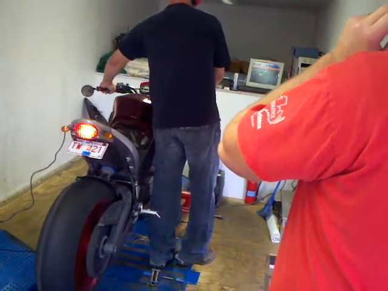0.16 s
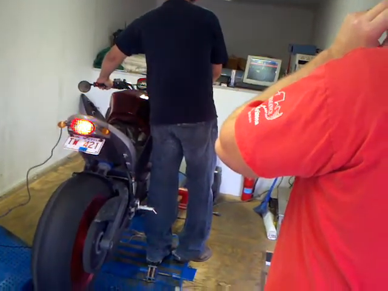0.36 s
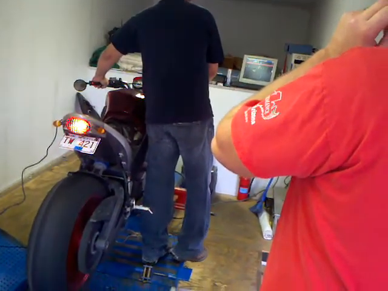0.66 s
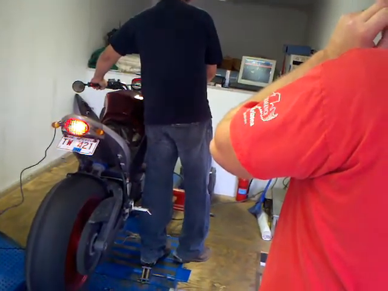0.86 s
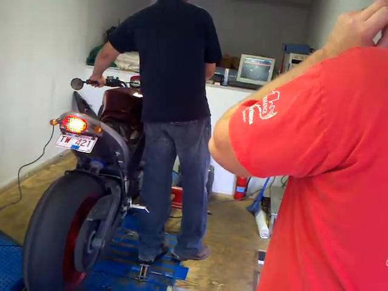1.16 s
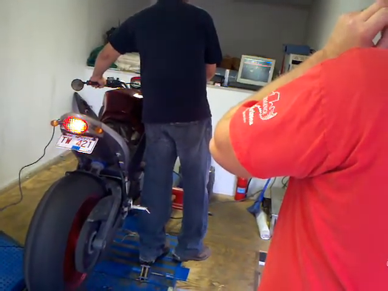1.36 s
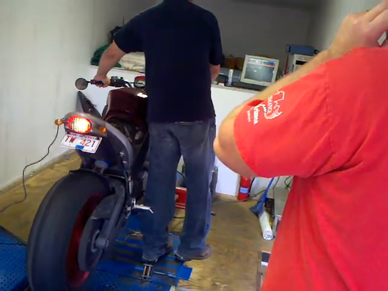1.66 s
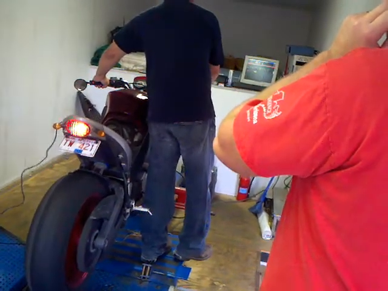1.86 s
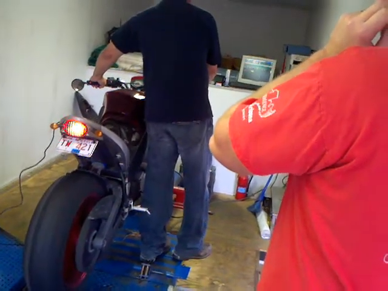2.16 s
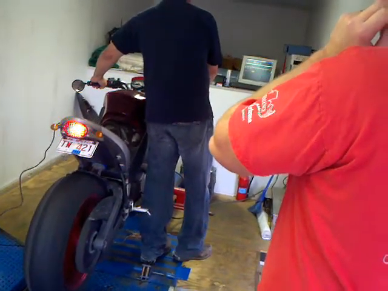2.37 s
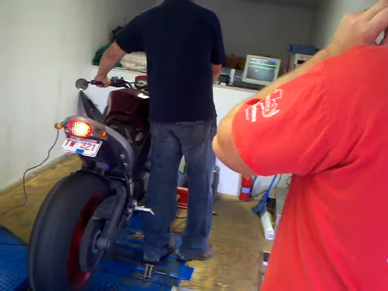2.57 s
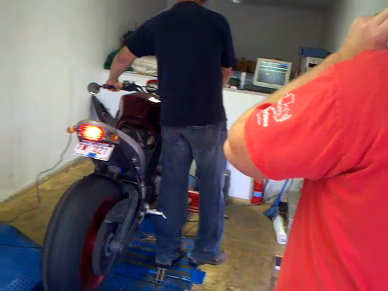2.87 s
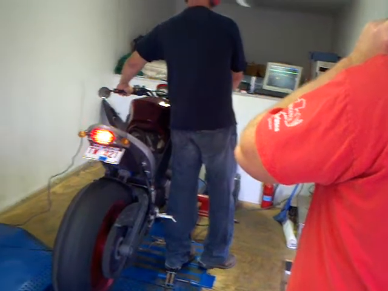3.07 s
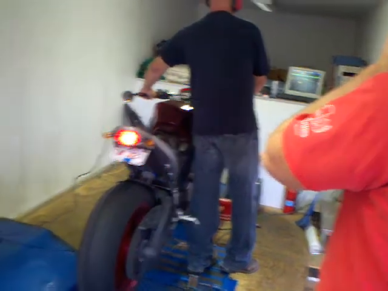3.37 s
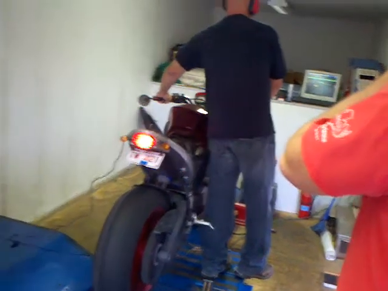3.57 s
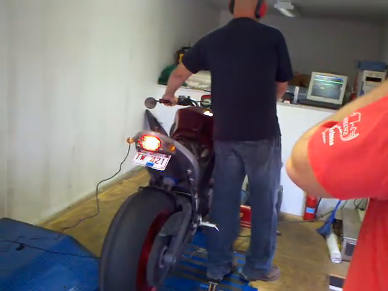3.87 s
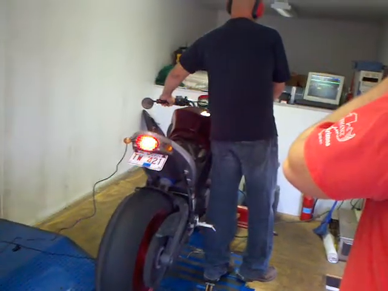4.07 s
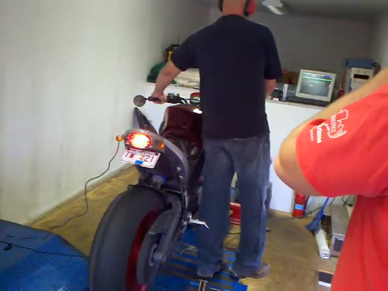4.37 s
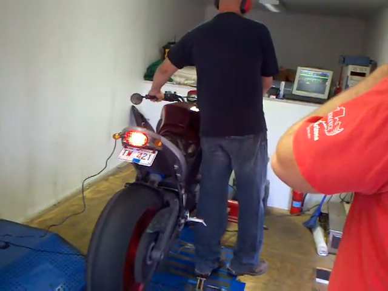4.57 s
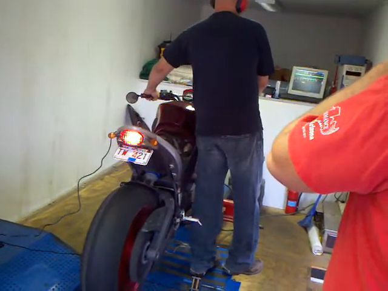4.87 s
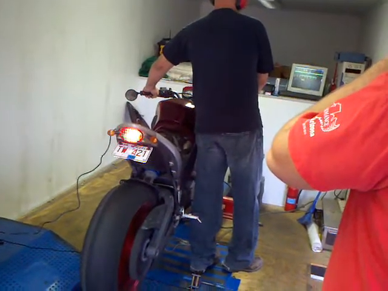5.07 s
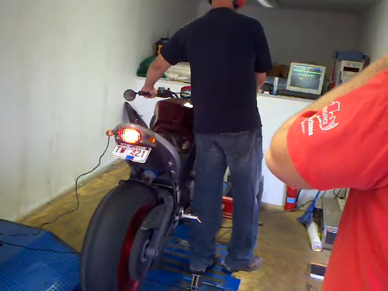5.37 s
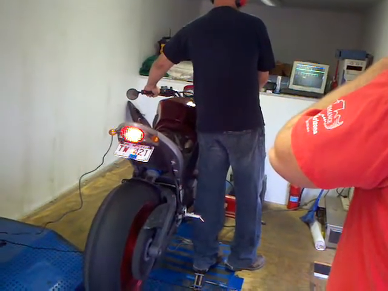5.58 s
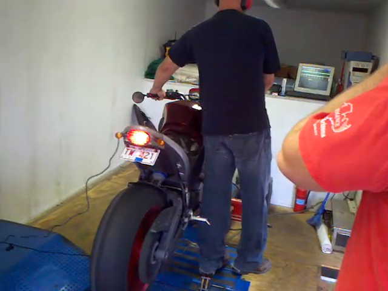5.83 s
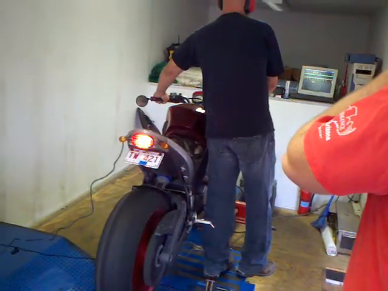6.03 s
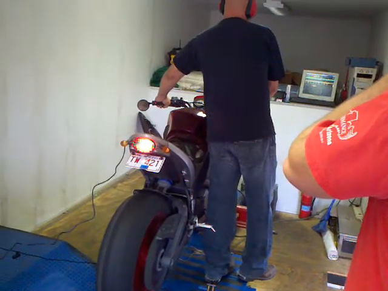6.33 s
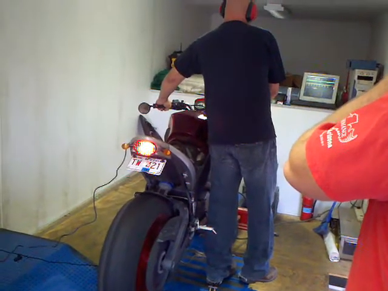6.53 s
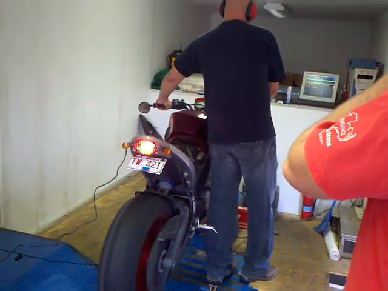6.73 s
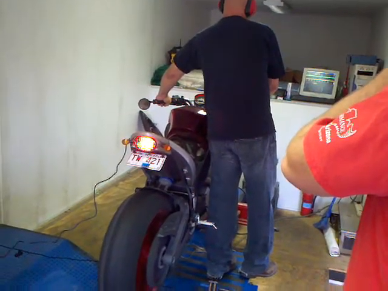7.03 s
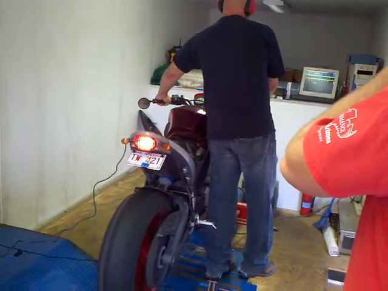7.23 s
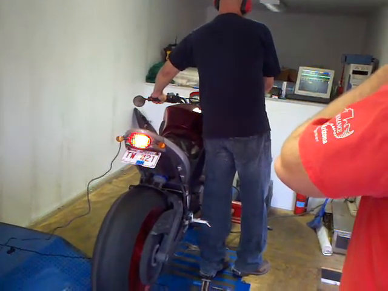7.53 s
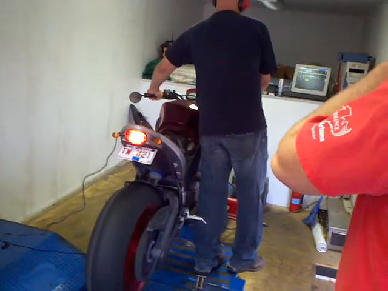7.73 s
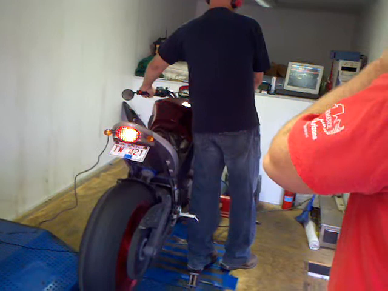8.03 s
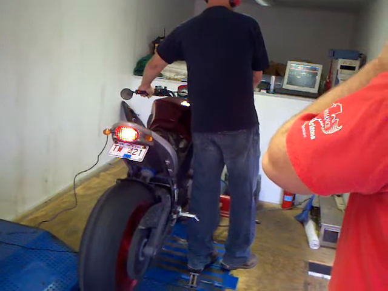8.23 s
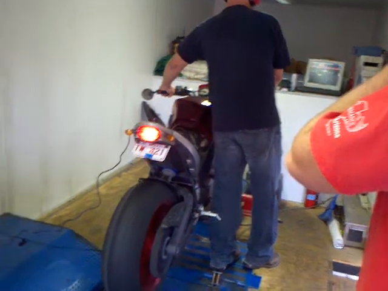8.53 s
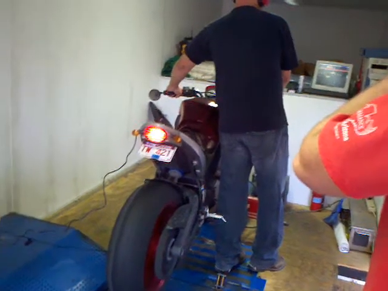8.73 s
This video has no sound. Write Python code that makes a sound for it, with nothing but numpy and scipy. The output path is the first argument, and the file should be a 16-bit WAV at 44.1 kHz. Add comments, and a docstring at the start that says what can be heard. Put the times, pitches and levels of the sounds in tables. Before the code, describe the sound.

A loud V-twin motorcycle holds a steady rough roar, drops to a soft whining coast, then pulls hard up to sustained high revs indoors.

```python
"""A small, hard-walled workshop: a V-twin motorcycle on a dynamometer, a widened stereo microphone close behind.
Steady load, a coast with the throttle shut, then a pull to high revs that it holds.
Unevenly spaced firing pulses ring pipe, headers and room; noise bursts at each firing give the cracks of gas.
A falling set of harmonics makes the whine of the drive belt in the coast."""
import sys
import numpy as np
from scipy import signal
from scipy.fft import rfft, irfft
from scipy.io import wavfile
from scipy.ndimage import uniform_filter1d

SR = 44100
rng = np.random.default_rng(int(sys.argv[2]) if len(sys.argv) > 2 else 0)


def waveform_to_disk(signal):
    """Save audio, clipped to [-1, 1], as 16-bit WAV at the path in sys.argv[1]."""
    frames = np.transpose(np.atleast_2d(signal))
    scaled = np.clip(frames, -1, 1) * 32767
    samples = np.round(scaled).astype(np.int16)
    wavfile.write(sys.argv[1], SR, samples)


N = 392490
T = np.arange(N) / SR
SIZE = 2 ** 19  # transform length, samples
FREQ = np.arange(SIZE // 2 + 1) * SR / SIZE

# engine speed: t/s, four-stroke cycle rate f/Hz
ENGINE_SPEED = [(0.0, 24.0), (1.56, 23.97), (1.7, 21.2), (2.1, 18.92), (2.85, 18.0), (3.1, 17.95),
                (3.3, 18.75), (3.5, 19.4), (3.8, 21.07), (5.0, 29.28), (5.6, 34.46), (5.9, 34.93),
                (6.45, 33.12), (6.95, 32.49), (7.5, 33.14), (8.1, 33.47), (8.9, 33.49)]
# the rider holds the throttle open: opens t/s, shuts t/s
THROTTLE_OPENINGS = [(-1, 1.565), (3.1, 10)]
# pipe and room resonances: f/Hz, width/Hz, relative level/dB at the left port, at the right port
PIPE_MODES = [(78, 2.7, -14, -25.5), (97.7, 15.6, -5, -39), (118.6, 15.4, -9, -33), (140, 5, -1, 3.5),
              (168.85, 20.3, 4, -18), (212.6, 10.9, 7, 0), (229.65, 12.67, 7.5, -10),
              (268.5, 14, -8.5, -1.5), (298.84, 18.5, -3, 5), (330.54, 9.7, -1.5, 4),
              (385.76, 10.47, 3.5, 1.5), (424, 14, -9, -10), (462, 18, -2.3, 0.3)]
# room resonances that build up late: f/Hz, width/Hz
LATE_MODES = [(156, 27), (198, 18), (288, 48), (348, 37), (380, 39)]
# phase by which the left port leads: f/Hz, phase/rad
PORT_PHASE = [(60, 7), (125, 2.74), (170, 4.88), (230, 3.307), (300, 1.784), (385, 1.407), (470, 2),
              (650, 1.7), (900, 1), (1300, .3)]
# higher resonances of the headers: f/Hz, width/Hz, level/dB at the left port, at the right port
HEADER_MODES = [(537, 28, 7.5, 11.7), (603, 10, 3.5, 8), (637.0, 44.6, 0.9, 7.8), (694, 10.7, 3, 10),
                (751.9, 54.6, 5.2, -1.3), (815, 9, 8, 6), (839.5, 14.5, 0.4, 3.3), (864.6, 9, 2, 5),
                (921.6, 70.0, -0.5, -1.7), (1116.1, 70.0, -2.7, -2.3), (1205.1, 10.0, -1.2, -0.1),
                (1270.0, 70.0, -5.1, -5.0), (1323.5, 19.9, 1.2, 1.1), (1460.0, 70.0, -4.6, -5.5)]
# returns from floor, walls and ceiling: delay t/s, relative level/dB
WALL_ECHOES = [(0, -1.5), (.003, 1), (.0085, -13), (0.011, -8), (0.018, -7)]
# colour of the rasping gas: f/Hz, relative spectral level/dB
RASP_COLOUR = [(50, -15.5), (120, 3.5), (250, 4.5), (450, 2.5), (700, -1.5), (1300, -2.8), (2000, -5),
               (3000, -7), (4200, -17), (5500, -12.5), (9000, -53), (14000, -54)]
# colour of the hissing gas: f/Hz, relative spectral level/dB
HISS_COLOUR = [(1000, -9.5), (2500, -1), (4000, 1.5), (5400, -5), (7500, 3.6), (9500, 2), (12000, -0.5),
               (14000, -2.5)]
# sharp ticks from the exhaust: t/s, level/dB before their common gain
EXHAUST_TICKS = [(1.5345, -8), (3.8637, -14), (3.9566, -9.5), (3.9809, -10.5)]
# first hard burns of the pull: t/s, level/dB before their common gain
FIRST_BURNS = [(3.206, -16), (3.261, -13), (3.316, -14), (3.368, -12), (3.421, -13)]
# belt teeth meshing: multiple of the tooth rate, mean level/dB
BELT_HARMONICS = [(2, -44), (3, -41.5), (6, -47.5), (9, -51), (10, -57), (12, -55)]
# belt tooth rate in the coast: t/s, f/Hz
TOOTH_RATE = [(1.6, 850), (1.88, 772), (2.1, 735), (2.55, 704), (2.95, 677), (3.2, 667)]

# layer laws, before each layer's trims: level/dB at full throttle and cruising speed, level/dB per octave
# of speed, level/dB in the coast, power of the cylinder filling, release t/s
BOOM_LAW = (-17, 6.5, -36, 0.48, 0.0239)
RASP_LAW = (-21.9, 7.8, -35.8, 4.5, 0.009)
HOWL_LAW = (-8.7, 12, -37, 3, 0.014)
HISS_LAW = (-33, 15, -41.5, 13, 0.04)
# resonant lift of the boom at one speed: cycle rate f/Hz, half width/Hz, level/dB
PIPE_TUNING = (30.2, 2.54, 1.46)
# share of gas leaving in cracks at full throttle: share (0-1) at cruising speed, change per octave
CRACK_SHARE = (0.46, -0.72)
# scatter from burn to burn: level/dB at cruising speed, level/dB per octave
BURN_SCATTER = (.7, -2.5)
# first minus second cylinder's crack: level/dB at steady speed, level/dB per Hz/s of acceleration
CYLINDER_LEAN = (1, -0.5)
# change per unit of filling the first cylinder lacks: first cylinder level/dB, second cylinder level/dB
CATCH_DB = (-18, 2)
# cycle rates between which the barks run together: starts f/Hz, complete f/Hz
BARK_FADE_HZ = [23.72, 31.5]

CRUISE_HZ = 24  # cycle rate at which the speed laws are given
START_TURN, VEE_GAP = .56, .44  # parts of a four-stroke cycle
JITTER_S, CRANK_SHAKE = .00004, .0012  # firing jitter; cycles of shake per dB of burn scatter
OPEN_S, SHUT_S = .06, 0.03  # time constants of the cylinders' filling and emptying
CATCH_S = 0.268  # time constant of the first cylinder, slower to burn hard again
CATCH_SHARE = .15  # extra share of rasp in cracks, per unit lacking
BITE_POWER = 3  # the cracks come only once the cylinders are nearly full
BOOM_FULL_HZ = 28.98  # above this cycle rate the boom's speed law is flat
SWELL_S, SWELL_DB = 0.1, -16  # hard-burn time constant (fresh air takes a quarter); gain of the soft swell
BARK_DB, BARK_FAST_DB = 2.7, -13.5  # against the rasp law; change at high revs
PULL_SMOOTH_S = 0.46  # span over which the acceleration is averaged
PULL_SMEAR = 0.095  # share of crack lost for each Hz/s of acceleration
COAST_HISS_HZ, COAST_HISS_WIDTH_HZ = 7500, 6500  # band of the whirr with the throttle shut
PORT_LAG_S = 1 / 2620  # delay of the opposite port in the microphone
TOP_HZ = 14000  # upper limit of the camera's sound


def burns(turns, cycle_hz, throttle):
    """Uneven burning shakes the crank and changes the size of the blows; the first cylinder catches late."""
    scatter_db = np.maximum(at_speed(cycle_hz, *BURN_SCATTER), 0)
    cylinders = firings(turns + CRANK_SHAKE * scatter_db * walk(30), JITTER_S)
    # keep the pulse power even as the firing rate changes
    cylinders = cylinders * np.sqrt(SR / cycle_hz / 2) * undb(scatter_db * walk(51))
    return cylinders * undb(np.outer(CATCH_DB, lacking(throttle)))


def firings(turns, jitter_s):
    """One pulse train per cylinder; the angle of the vee spaces them unevenly."""
    trains = np.zeros((2, N))
    for train, offset in zip(trains, (0, VEE_GAP)):
        cycles = np.arange(int(turns[-1]) + 1) + offset
        when = np.interp(cycles, turns, T, left=-1, right=-1)
        at = ((when + jitter_s * rng.standard_normal(len(when))) * SR).astype(int)
        train[at[(at >= 0) & (at < N)]] = 1
    return trains


def blows(pulses, throttle, cycle_hz, coast_hz=120, coast_db=16.0, short_hz=150, short_db=3,
          low_rev_hz=26, high_rev_hz=32):
    """Shut throttle gives soft puffs; at high revs the blows run together and lose their bass."""
    fast = np.clip((cycle_hz - low_rev_hz) / (high_rev_hz - low_rev_hz), 0, 1)
    short = filtered(pulses, causal(undb(short_db) * abs(1 - lowpass(short_hz)) ** 4))
    soft = filtered(pulses, undb(coast_db) * lowpass(coast_hz) ** 2)
    hard = np.sqrt(1 - fast) * pulses + np.sqrt(fast) * short
    return throttle * hard + (1 - throttle) * soft


def boom(push, bass_hz=72, top_hz=1500, edge_hz=520, gain_db=4.3):
    """Firings ring the pipe and the room, which fills the gaps between them."""
    bass_cut = 1 + (bass_hz / (FREQ + 1)) ** 8
    body = causal(np.sqrt(mode_power(PIPE_MODES) / bass_cut) * abs(lowpass(top_hz)) ** 2)
    body = body / np.sqrt(1 + (FREQ / edge_hz) ** 24)
    for hz, width in LATE_MODES:
        body = body * (1 - 2 * resonance(hz, width))  # an allpass: later, not louder
    body[1] *= np.exp(-1j * over_hz(PORT_PHASE))
    return filtered(push, -undb(gain_db) * body / np.sqrt(np.mean(abs(body) ** 2)))


def pipe_lift(cycle_hz):
    """Extra boom in dB while the firings are in step with the pipe."""
    tuned_hz, width_hz, lift_db = PIPE_TUNING
    return lift_db * np.exp(-((cycle_hz - tuned_hz) / width_hz) ** 2)


def swell(pulses, hz=170, width_hz=55):
    """Fresh air reaches the cylinders before they burn hard: round, low puffs lead the pull."""
    unburnt = np.maximum(filling(SWELL_S / 4) - filling(SWELL_S, 2), 0)
    return undb(SWELL_DB) * unburnt * filtered(pulses, abs(resonance(hz, width_hz)))


def howl(cylinders, low_hz=495, top_hz=1350, far_db=-10):
    """The headers ring with every firing, most with those of the near (second) cylinder."""
    bass_cut = 1 + (low_hz / (FREQ + 1)) ** 24
    gain = np.sqrt(mode_power(HEADER_MODES) / bass_cut) * abs(lowpass(top_hz))
    # both ports share one phase before the right port's lag
    body = gain * np.exp(1j * np.angle(causal(gain.mean(axis=0))))
    body[1] *= np.exp(-1j * over_hz(PORT_PHASE))
    return filtered(undb(far_db) * cylinders[0] + cylinders[1], body)


def shock(pulses, return_s=0.003014, return_db=-3, low_hz=90, tail_hz=200, top_hz=1700):
    """The steep front of a firing arrives straight from the pipe; a suction wave follows it."""
    suction = 1 - undb(return_db) * np.exp(-2j * np.pi * FREQ * return_s) * lowpass(top_hz)
    front = (1 - lowpass(low_hz)) ** 2 * lowpass(tail_hz) * lowpass(top_hz) ** 2
    return unit(filtered(pulses, suction * front))


def gas_envelope(pulses, share, fade_hz=150, rise_hz=1500):
    """Each firing's burst of gas comes again from every wall, over an even rush."""
    echoes = sum(undb(db) ** 2 * np.exp(-2j * np.pi * FREQ * s) for s, db in WALL_ECHOES)
    power = np.maximum(filtered(pulses ** 2, echoes * lowpass(fade_hz) * lowpass(rise_hz)), 0)
    return np.sqrt(share * power / power.mean() + 1 - share)


def turbulence(grain_db, grain_hz):
    """Gas is noise, separate at the two ports, with a crackle in level that they share."""
    return unit(rng.standard_normal((2, N)) * undb(grain_db * walk(grain_hz)))


def slap(pulses, t60=0.035):
    """The steep front of each firing scatters off benches and walls the same way every time."""
    scatter = rng.standard_normal((2, N // 8)) * undb(-60 * T[:N // 8] / t60)
    return unit(filtered(pulses, rfft(scatter, SIZE) * (1 - lowpass(430)) ** 2))


def ticks(decay_s=0.0041, gain_db=-8):
    """A few bright exhaust snaps are decaying noise in the colour of the hiss."""
    return noise_bursts(EXHAUST_TICKS, decay_s, gain_db, HISS_COLOUR)


def coughs(decay_s=0.008, gain_db=-2):
    """The first hard burns after the throttle opens each spit a separate burst of gas."""
    return noise_bursts(FIRST_BURNS, decay_s, gain_db, RASP_COLOUR)


def noise_bursts(table, decay_s, gain_db, colour):
    """Gas let go at once starts abruptly and dies exponentially."""
    envelope = sum(undb(db + gain_db) * (T >= s) * np.exp(-abs(T - s) / decay_s) for s, db in table)
    return coloured(envelope * rng.standard_normal((2, N)), colour)


def belt(throttle, flutter=0.03, waver_db=3.5):
    """Belt teeth mesh with the pulley and sing while the belt runs slack and the roller slows."""
    tooth_hz, = curves(TOOTH_RATE)
    tooth = np.cumsum(tooth_hz) / SR + flutter * walk(20.6)
    song = np.zeros((2, N))
    for port in song:
        for multiple, db in BELT_HARMONICS:
            phase = 2 * np.pi * round(multiple) * tooth + rng.uniform(0, 2 * np.pi)
            port += undb(db + waver_db * walk(24)) * np.sin(phase)
    return song * (1 - throttle)


def workshop(x, t60=0.095, wet_db=-11):
    """The short diffuse tail of a small hard room."""
    t = T[:SR // 2]
    tail = rng.standard_normal((2, len(t))) * np.exp(-np.log(1000) * t / t60)
    tail /= np.sqrt(np.sum(tail ** 2, axis=1, keepdims=True))
    return x + undb(wet_db) * filtered(x, rfft(tail, SIZE))


def widen(x, left_hz=5000, right_hz=11000):
    """The microphone subtracts a late copy of each port from the other, less so in the treble."""
    late = np.exp(-2j * np.pi * FREQ * PORT_LAG_S)
    feed = np.array([1 / (1 + (FREQ / left_hz) ** 8), 1 / (1 + (FREQ / right_hz) ** 2)])
    spectrum = rfft(x, SIZE)
    return irfft((spectrum - feed * late * spectrum[::-1]) / np.sqrt(1 + feed ** 2))[:, :N]


def filling(open_s, power=1, shut_s=SHUT_S):
    """How full the cylinders are, 0-1: swells on opening, dies on shutting; a high power starts late."""
    full = np.zeros(N)
    for opens, shuts in THROTTLE_OPENINGS:
        rise = (1 - np.exp(-np.maximum(T - opens, 0) / open_s)) ** power
        full += rise * np.exp(-np.maximum(T - shuts, 0) / shut_s)
    return full


def lacking(throttle):
    """How far the first cylinder lags behind just after the throttle opens, 0-1."""
    return throttle - filling(CATCH_S)


def pulling(cycle_hz):
    """How fast the engine gains speed, in Hz/s."""
    return np.maximum(uniform_filter1d(np.gradient(cycle_hz) * SR, int(PULL_SMOOTH_S * SR)), 0)


def at_speed(cycle_hz, value, per_octave):
    """A quantity that changes evenly with each octave of engine speed."""
    return value + per_octave * np.log2(cycle_hz / CRUISE_HZ)


def loudness(law, cycle_hz):
    """Level of a layer in dB: the throttle lifts it from the coast to a level set by speed."""
    full_db, octave_db, coast_db, power, release_s = law
    drive = filling(OPEN_S, power, release_s)
    full = undb(at_speed(cycle_hz, full_db, octave_db))
    return 20 * np.log10(drive * full + (1 - drive) * undb(coast_db))


def undb(db):
    """Decibels to gain."""
    return 10 ** (np.asarray(db) / 20)


def unit(x):
    """Scale to rms 1."""
    return x / np.sqrt(np.mean(x ** 2))


def curves(table):
    """One value per sample for each column of a timed table."""
    s, *columns = np.transpose(table)
    return [np.interp(T, s, c) for c in columns]


def over_hz(table):
    """A (f/Hz, value) table joined on a log-frequency axis."""
    hz, value = np.transpose(table)
    return np.interp(np.log(FREQ + 1), np.log(hz), value)


def resonance(hz, width):
    """Response of one mode, gain 1 at its centre."""
    return 1 / (1 + 1j * (FREQ - hz ** 2 / (FREQ + 1)) / width)


def mode_power(table):
    """Summed power response of a set of modes at the two ports."""
    return sum(undb(ports)[:, None] ** 2 * abs(resonance(hz, width)) ** 2 for hz, width, *ports in table)


def causal(gain):
    """The earliest-ringing (minimum-phase) filter that has this gain."""
    cepstrum = irfft(np.log(gain + 1e-6))
    cepstrum[..., 1:SIZE // 2] *= 2
    cepstrum[..., SIZE // 2 + 1:] = 0
    return np.exp(rfft(cepstrum))


def filtered(x, response):
    """Pass x through a frequency response."""
    return irfft(rfft(x, SIZE) * response)[..., :N]


def lowpass(hz):
    """Response of one pole."""
    return 1 / (1 + 1j * FREQ / hz)


def coloured(x, table):
    """Give white sound a colour and keep its level."""
    return filtered(x, causal(unit(undb(over_hz(table)))))


def walk(hz):
    """Slow chance with spread 1."""
    return unit(filtered(rng.standard_normal(N), lowpass(hz) ** 2))


def scene():
    """Engine speed times the firings; the throttle sets how hard each one hits."""
    cycle_hz, = curves(ENGINE_SPEED)
    throttle, bite, pull = filling(OPEN_S), filling(OPEN_S, BITE_POWER), pulling(cycle_hz)
    boom_db = loudness(BOOM_LAW, np.minimum(cycle_hz, BOOM_FULL_HZ)) + pipe_lift(cycle_hz)
    rasp_db = loudness(RASP_LAW, cycle_hz)
    hiss_db = loudness(HISS_LAW, cycle_hz)

    turns = START_TURN + np.cumsum(cycle_hz) / SR
    cylinders = burns(turns, cycle_hz, throttle)
    share = np.clip(bite * at_speed(cycle_hz, *CRACK_SHARE) * (1 - PULL_SMEAR * pull), 0, .98)
    lean_db = CYLINDER_LEAN[0] + CYLINDER_LEAN[1] * pull
    crack_db = np.array([lean_db, -lean_db]) / 2 + 1.3 * walk(30.5)
    cracks = (cylinders * undb(crack_db)).sum(axis=0)
    rasp_share = np.clip(share + CATCH_SHARE * bite * lacking(throttle), 0, .98)
    bursts = gas_envelope(cracks, rasp_share)

    # the gas itself also stirs the resonances
    push = cylinders.sum(axis=0) + undb(-25) * throttle * bursts * rng.standard_normal(N)
    exhaust = boom(blows(push, throttle, cycle_hz) * undb(boom_db) + swell(push))
    headers = howl(cylinders * undb(loudness(HOWL_LAW, cycle_hz)))

    # slow, heavily loaded firings stand out as separate barks
    bark_db = rasp_db + BARK_DB + np.interp(cycle_hz, BARK_FADE_HZ, [0, BARK_FAST_DB])
    bark = shock(cracks) * bite * np.maximum(1 - PULL_SMEAR * pull / 2, 0) * undb(bark_db)

    rasp = bursts * turbulence(grain_db=2.0, grain_hz=398) + undb(-9) * bite * slap(cracks)
    rasp = coloured(rasp * undb(rasp_db + 3.7 - 0.84 * share), RASP_COLOUR)

    hiss = gas_envelope(cracks, share * 1.047) * turbulence(grain_db=0.5, grain_hz=600)
    hiss = hiss * undb(0.86 * walk(19.5))
    # with the throttle shut the hiss narrows to the whirr of the drive
    whirr = filtered(hiss, abs(resonance(COAST_HISS_HZ, COAST_HISS_WIDTH_HZ)))
    hiss = throttle * hiss + (1 - throttle) * whirr
    hiss = coloured(hiss * undb(hiss_db + 6.5), HISS_COLOUR)

    gas = workshop(rasp + hiss + ticks() + coughs())
    return exhaust + headers + widen(bark + gas + belt(throttle))


def record(dry):
    """The camera flattens the loudest peaks and cuts the top."""
    rounded = dry / (1 + (abs(dry) / 1.02) ** 8) ** (1 / 8)
    return signal.sosfilt(signal.ellip(12, .2, 70, TOP_HZ, fs=SR, output="sos"), rounded)


dry = scene()
out = record(dry)
waveform_to_disk(out)
```